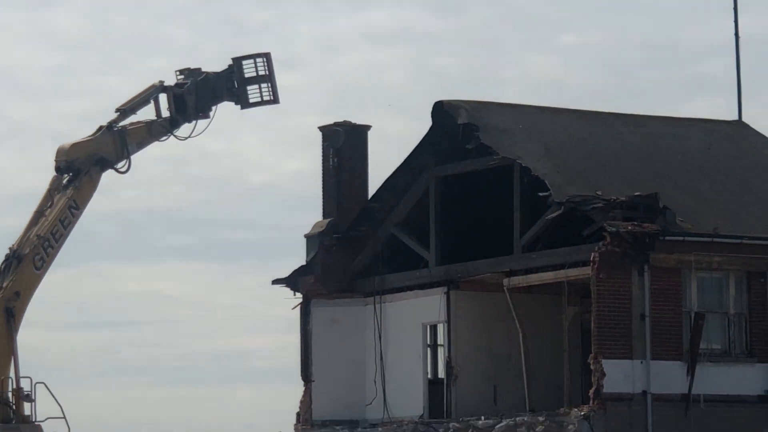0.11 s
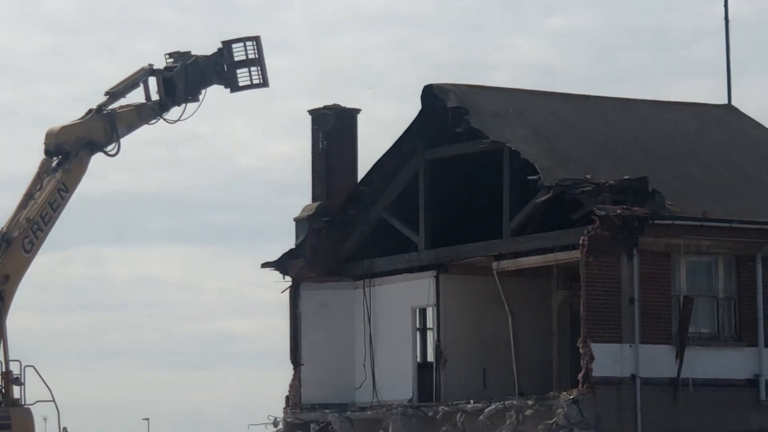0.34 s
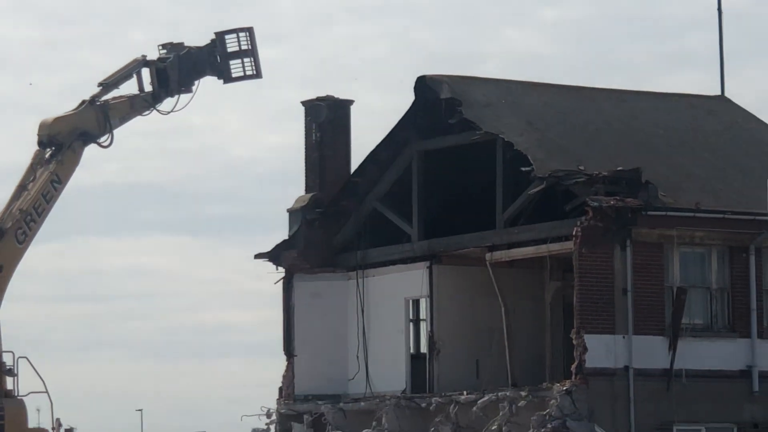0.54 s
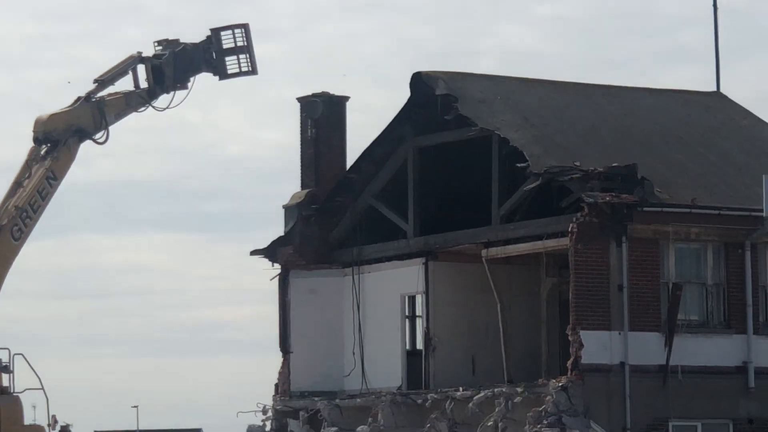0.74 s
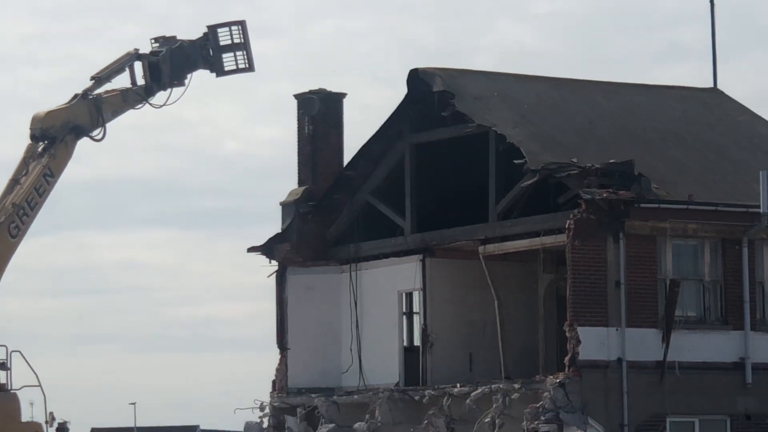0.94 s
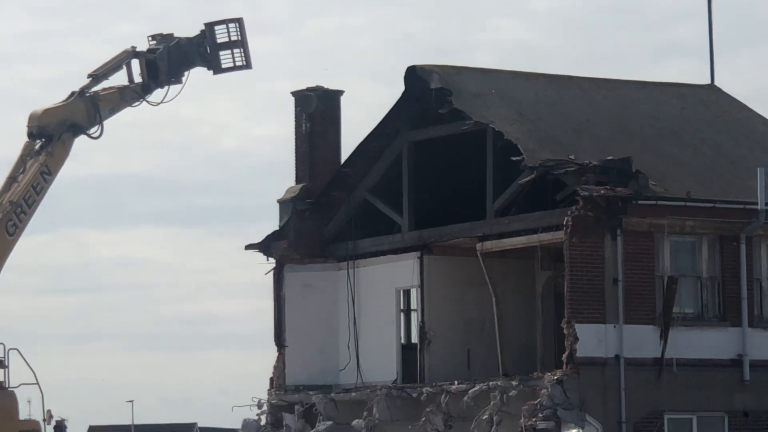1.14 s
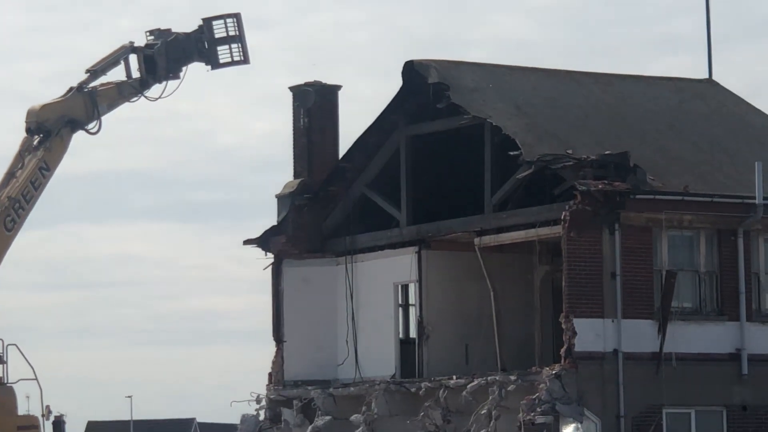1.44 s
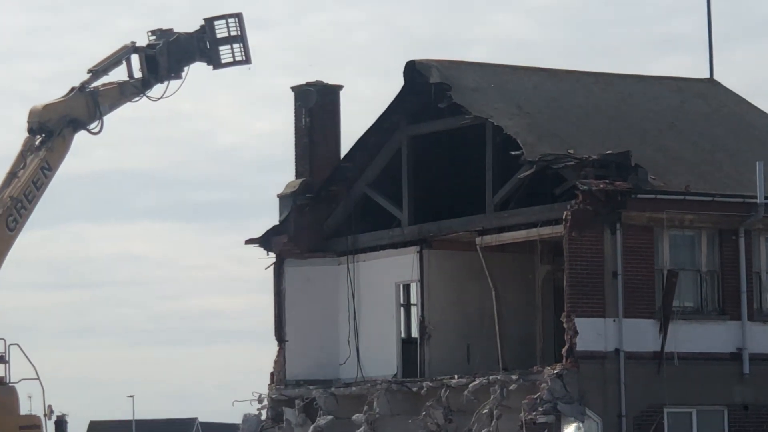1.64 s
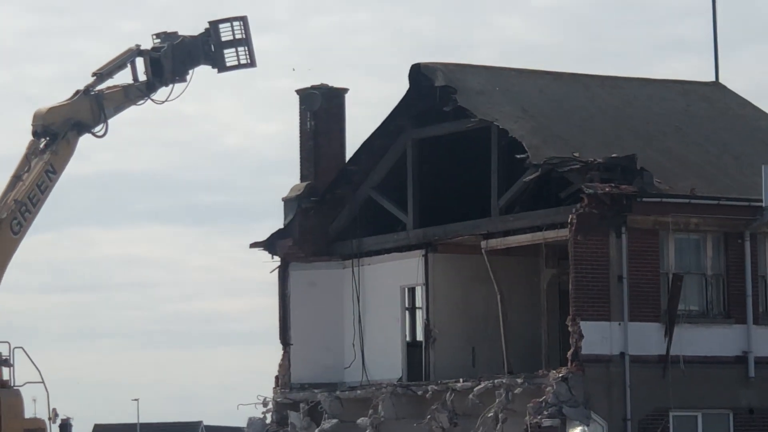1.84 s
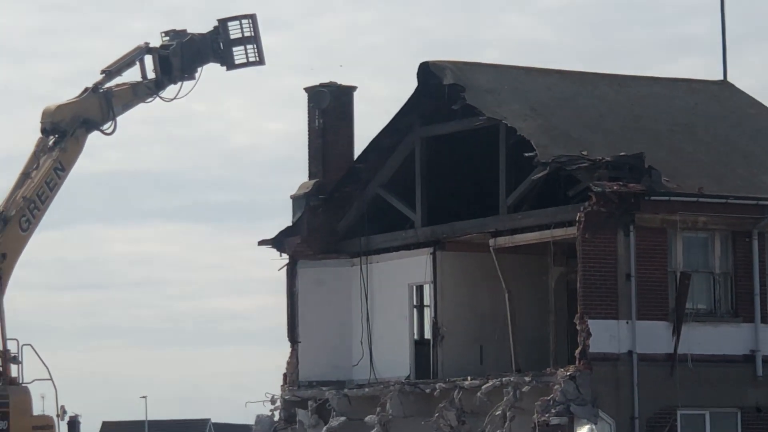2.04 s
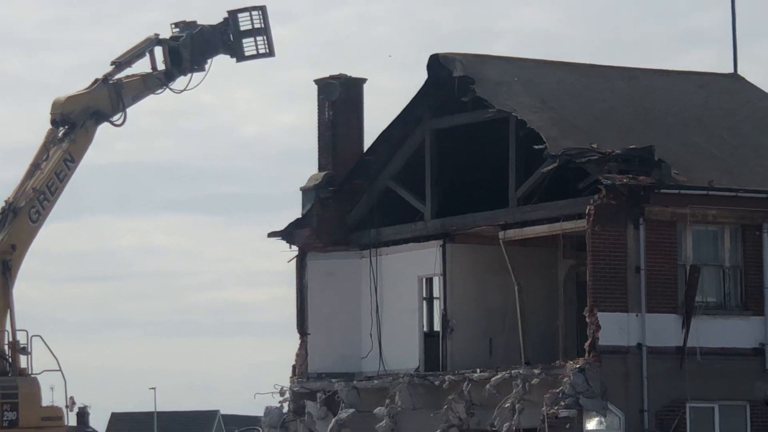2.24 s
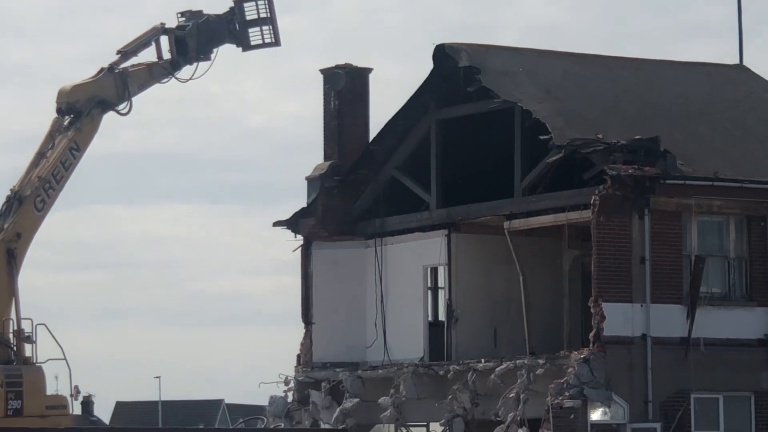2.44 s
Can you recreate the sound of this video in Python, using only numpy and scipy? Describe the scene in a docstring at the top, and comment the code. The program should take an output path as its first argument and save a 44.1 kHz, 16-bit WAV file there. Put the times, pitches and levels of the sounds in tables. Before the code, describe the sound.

Two dull, woody knocks of falling rubble on an open demolition site, the first cut short, the second trailing loose tumbling and small bumps; a far excavator rumbles low beneath faint hiss and tiny steady ticks.

```python
"""Two hard, hollow knocks of falling debris at a demolition site, each followed by a dull rattle that stops short.
The knocks are damped impulses whose bass lags the treble; the rattles are random grains ringing the rubble.
Smaller pieces bump down as short decaying tones, heavy ones slide as rough gliding tones, and fine grit sprays.
Faint, even ticking and a little hiss lie close to the microphone; far off, an excavator rumbles as low noise."""
import sys
import numpy as np
from scipy import signal
from scipy.fft import rfft, irfft
from scipy.io import wavfile

SR = 44100
rng = np.random.default_rng(int(sys.argv[2]) if len(sys.argv) > 2 else 0)


def log_audio(samples):
    """Write samples as a 16-bit WAV file to the path given in sys.argv[1]."""
    # one column per channel
    frames = np.atleast_2d(samples).T
    # limit to full scale, then quantise
    limited = np.clip(frames, -1, 1)
    pcm = np.round(limited * 32767).astype(np.int16)
    wavfile.write(sys.argv[1], SR, pcm)


N = 114660  # samples, 2.6 s
TIME, FREQS = np.arange(N) / SR, np.fft.rfftfreq(N, 1 / SR)  # s, Hz

# the two knocks: start_s, level_db, tilt_db_per_octave, bass_db, top_edge_db
KNOCKS = [(0.2094, 16.4, 0, 0.8, 0), (0.8624, 12.6, -.5, -5, 14)]
# what the struck debris gives back: frequency_hz, gain_db
KNOCK_BODY = [(25, -49), (55, -17.5), (125, -11), (215, -10), (272, -16.5), (305, -11), (380, -17),
              (480, -11.5), (600, -2.5), (775, 1), (900, -7.5), (1100, -13.5), (1350, -22.5), (1520, -22),
              (1750, -33), (1950, -29), (2190, -36), (2290, -48.5), (2400, -39), (2580, -33.5), (2880, -49),
              (3100, -45), (3380, -58), (3540, -52), (4100, -68.5), (7000, -97), (14000, -135)]
LAG_S, LAG_POWER = 0.001448, 0.98  # bending waves: lag near 1 kHz, and how it grows toward the bass
BASS_HZ, TOP_HZ = 130.55, 3880  # corners of each knock's bass and top edge

# rattle after each knock: time_s, bass_db, middle_db, upper_middle_db, treble_db
SHORT_RATTLE = [(0.213, -45.5, -32.5, -51, -69), (0.235, -39.5, -34, -48, -60.5),
                (0.262, -42.5, -37.5, -46, -57), (0.282, -42, -39.5, -47, -59), (0.292, -33, -56, -74, -89)]
LONG_RATTLE = [(0.866, -49.5, -52.5, -58.5, -68), (0.888, -50.5, -40.5, -45, -60),
               (0.925, -46.5, -46, -56.5, -66.5), (0.993, -47, -49, -49.5, -67),
               (1.02, -51.5, -47.5, -57.5, -66), (1.115, -47, -52, -58, -73), (1.162, -40, -44, -58, -67),
               (1.171, -45, -44.5, -52.5, -54.5), (1.205, -42.5, -48, -54, -66),
               (1.29, -52, -51.5, -60, -70.5), (1.38, -50, -53, -66.5, -81), (1.48, -49, -59, -62.5, -74.5),
               (1.63, -53, -53, -65.5, -81), (1.72, -53.5, -60, -71.5, -81), (1.76, -48.5, -54, -69, -83),
               (1.775, -65.5, -107, -97, -97)]
# borders between the rattle's four bands: frequency_hz
RATTLE_SPLITS_HZ = [330, 930, 1703]
# broad colour of the rattling rubble: frequency_hz, gain_db
RATTLE_BODY = [(30, -18.5), (100, 1.5), (210, -0.5), (260, -6.5), (390, -7), (470, -3), (540, -4.5),
               (610, -5.5), (690, -8), (820, -4), (1000, -14.5), (1200, -16.5), (1480, -15), (1720, -23),
               (1900, -23.5), (2400, -30.5), (2950, -32), (3200, -49.5), (5000, -70)]
# narrow rings in the rubble: frequency_hz, lift_db
RINGS = [(205, 3), (495, 5.5), (825, 4), (1070, 4), (1318, 4), (1487, 10), (2700, 9.5)]
SHORT_RING_WIDTH_HZ, LONG_RING_WIDTH_HZ = 65, 11
GRAINS_PER_S = 4500  # mean rate of small contacts
RATTLE_EDGE_S = 0.0036  # the rattle starts and stops this quickly

# heavy pieces sliding: start_s, length_s, level_db, start_pitch_hz, end_pitch_hz
GROANS = [(1.02, 0.037, -44.5, 496, 540), (1.155, 0.063, -44, 472, 489), (1.21, 0.18, -47.5, 458.4, 430),
          (1.255, 0.08, -44, 241.5, 74), (1.43, 0.076, -46.5, 159.7, 212), (1.53, 0.08, -42.5, 150, 94)]
GROAN_ROUGH, GROAN_WIDTH_HZ = 0.56, 40  # noisy share 0-1, and its spread to each side of the pitch

# small pieces landing: start_s, level_db, pitch_hz, t60_s
BUMPS = [(0.111, -46.5, 620, 0.019), (0.187, -39.5, 788, 0.022), (0.397, -47.5, 203, 0.064),
         (0.643, -52, 330, 0.031), (0.648, -48, 92, 0.11), (1.124, -36.5, 486, 0.093),
         (1.437, -43, 585, 0.11), (1.634, -35, 370, 0.014), (1.691, -39.5, 102, 0.1),
         (1.753, -37.5, 676, 0.021), (1.851, -48, 210.4, 0.076)]
BUMP_RISE_S = 0.001

# fine grit, the first knock's crack, its spray, a late trickle: start_s, length_s, level_db
GRIT = [(0.2095, 0.004, -64.5), (0.215, 0.059, -67.5), (0.553, 0.0194, -76.5)]
GRIT_CLUMP_DB, GRIT_CLUMP_HZ = 1.5, 150  # rms unevenness, and its fastest rate
# colour of the grit: frequency_hz, gain_db
GRIT_COLOUR = [(1500, -15), (5000, 0.5), (15000, -9.5)]

# one tick close to the microphone: length_s, level_db, start_pitch_hz, end_pitch_hz
TICK = (.003, -60.8, 2050, 1050)
TICK_HZ, TICK_FIRST_S, TICK_SPREAD_DB = 29.97, 0.0219, 1  # rate, first onset, random level spread
RETURN_S, RETURN_DB = 0.02, -9  # the weaker stroke after each tick

# colour of the distant engine: frequency_hz, gain_db
RUMBLE = [(24, -24.5), (39, 3), (50, -7.5), (65, -2.5), (105, -1.5), (150, -8.5), (220, -13), (320, -26),
          (2000, -68)]
# how the engine comes and goes: time_s, level_db
RUMBLE_LEVEL = [(0, -55), (0.4, -53), (0.75, -60), (1.85, -56), (2.27, -59.5), (2.33, -54), (2.45, -58),
                (2.6, -60)]
# colour of the site air and hiss: frequency_hz, gain_db
AIR = [(30, -9), (400, 0), (850, 1.5), (1200, -5.5), (1550, -8), (1800, -14.5), (2150, -15), (3500, -17),
       (8000, -22.5), (12000, -27.5), (15500, -33.5)]
AIR_DB = -65.5

EDGE_HZ = 15750  # the recorder's upper limit


def knock(level_db, tilt_db, bass_db, top_db, size=8192):
    """One blow through a heavily damped body; the treble arrives first, so it chirps down into a thump."""
    hz = abs(np.fft.fftfreq(size, 1 / SR))
    bass_shelf_db = bass_db / (1 + (hz / BASS_HZ) ** 2)
    top_shelf_db = top_db * (1 - 1 / (1 + (hz / TOP_HZ) ** 10))
    slope_db = tilt_db * np.log2((hz + 20) / 1000)
    gain = amp(read(KNOCK_BODY, hz) + slope_db + bass_shelf_db + top_shelf_db)

    # minimum phase: the body answers at once, with no sound ahead of the blow
    half = size // 2 + 1
    causal = np.exp(np.conj(signal.hilbert(np.log(gain))))[:half]

    # summing the lag over frequency gives the phase that delays the bass
    lag = LAG_S * (1000 / (hz[:half] + 20)) ** LAG_POWER
    delay = np.exp(-2j * np.pi * np.cumsum(lag) * SR / size)
    wave = irfft(causal * delay)[:size // 2]
    return amp(level_db) * wave / np.linalg.norm(wave)


def rattle(levels, ring_width_hz):
    """Dense small contacts ring the rubble; four bands swell and fade on their own."""
    signs = rng.choice([-1, 1], N)
    grains = signs * (rng.random(N) < GRAINS_PER_S / SR)
    rings_db = sum(db / (1 + (2 * (FREQS - hz) / ring_width_hz) ** 2) for hz, db in RINGS)
    spectrum = rfft(grains) * amp(read(RATTLE_BODY, FREQS) + rings_db)

    band = np.searchsorted(np.sort(RATTLE_SPLITS_HZ), FREQS)
    times, *curves = np.transpose(levels)
    out = np.zeros(N)
    for k, level_db in enumerate(curves):
        band_sound = unit(irfft(spectrum * (band == k), N))
        out += band_sound * amp(np.interp(TIME, times, level_db))

    nearest_end_s = np.minimum(TIME - times[0], times[-1] - TIME)
    sounding = np.sin(np.pi / 2 * np.clip(nearest_end_s / RATTLE_EDGE_S, 0, 1)) ** 2
    return sounding * out


def groan(length, level_db, from_hz, to_hz):
    """A heavy piece slides and grips unevenly, its rough resonance bending as it goes."""
    ring = glide(length, level_db, from_hz, to_hz)
    roughness = wobble(GROAN_WIDTH_HZ)[:len(ring)]
    return ring * (np.sqrt(1 - GROAN_ROUGH) + np.sqrt(GROAN_ROUGH) * roughness)


def bump(level_db, hz, t60):
    """A small piece lands with a short, dull ring that decays exponentially."""
    t = TIME[:SR // 5]
    decay = amp(level_db - 60 * t / t60)
    rise = np.minimum(t / BUMP_RISE_S, 1)
    return decay * rise * np.sin(2 * np.pi * hz * t)


def grit(start, length, level_db):
    """A brief, uneven spray of fine particles, heard as clumped noise."""
    arch = np.sqrt(abs(np.sin(np.pi * np.clip((TIME - start) / length, 0, 1))))
    spray = rng.standard_normal(N) * amp(GRIT_CLUMP_DB * wobble(GRIT_CLUMP_HZ))
    return amp(level_db) * arch * coloured(spray, GRIT_COLOUR)


def ticking():
    """Tiny regular ticks close by, each a falling chirp with a weaker return stroke."""
    out, click = np.zeros(N), glide(*TICK)
    for s in np.arange(TICK_FIRST_S, N / SR, 1 / TICK_HZ):
        add(out, s, amp(TICK_SPREAD_DB * rng.standard_normal()) * click)
        add(out, s + RETURN_S, amp(RETURN_DB) * click)
    return out


def background():
    """Far engine rumble, rising and sinking as low noise, under steady air and hiss."""
    rumble_gain = amp(np.interp(TIME, *np.transpose(RUMBLE_LEVEL)))
    rumble = rumble_gain * coloured(rng.standard_normal(N), RUMBLE)
    air = amp(AIR_DB) * coloured(rng.standard_normal(N), AIR)
    return rumble + air


def glide(length, level_db, from_hz, to_hz):
    """A ring that swells and fades while its pitch slides."""
    u = np.arange(0, length, 1 / SR) / length
    pitch_hz = from_hz + (to_hz - from_hz) * u
    return amp(level_db) * np.sin(np.pi * u) * np.sin(2 * np.pi * np.cumsum(pitch_hz) / SR)


def wobble(hz):
    """Random variation up to a rate, at rms 1."""
    return unit(irfft(rfft(rng.standard_normal(N)) * (FREQS < hz), N))


def coloured(x, points):
    """Gives a signal a spectrum, at rms 1."""
    return unit(irfft(rfft(x) * amp(read(points, FREQS)), N))


def read(points, hz):
    """Reads a spectrum table on a log-frequency axis."""
    f, db = np.transpose(points)
    return np.interp(np.log(hz + 1), np.log(f + 1), db)


def unit(x):
    """Scales to rms 1."""
    return x / np.sqrt(np.mean(x ** 2) + 1e-30)


def amp(db):
    """Decibels to gain."""
    return 10 ** (np.asarray(db) / 20)


def add(mix, s, sound):
    """Mixes a sound in at a time."""
    part = mix[max(round(s * SR), 0):][:len(sound)]
    part += sound[:len(part)]


def scene():
    """Knocks, rattles, sliding and falling pieces over the site's background."""
    out = background() + ticking()
    out += sum(grit(*row) for row in GRIT)
    out += rattle(SHORT_RATTLE, SHORT_RING_WIDTH_HZ) + rattle(LONG_RATTLE, LONG_RING_WIDTH_HZ)
    for source, table in (knock, KNOCKS), (bump, BUMPS), (groan, GROANS):
        for s, *row in table:
            add(out, s, source(*row))
    return out[None]


def record(dry):
    """The recorder's band limit, a steep linear-phase low-pass."""
    low_pass = signal.firwin(511, EDGE_HZ, window=("kaiser", 9), fs=SR)
    return signal.oaconvolve(dry, low_pass[None], "same")


dry = scene()
out = record(dry)
log_audio(out)
```